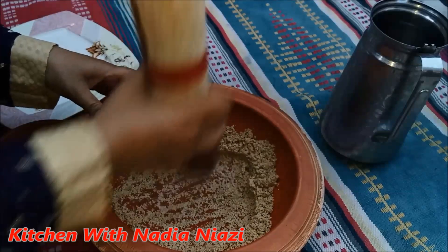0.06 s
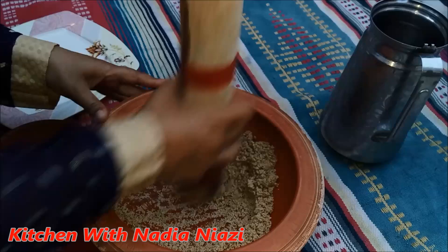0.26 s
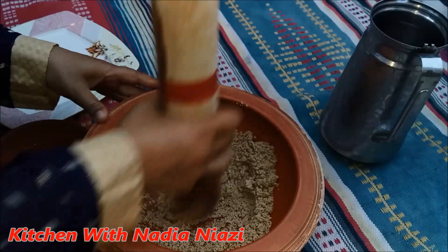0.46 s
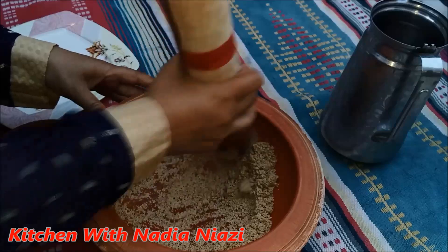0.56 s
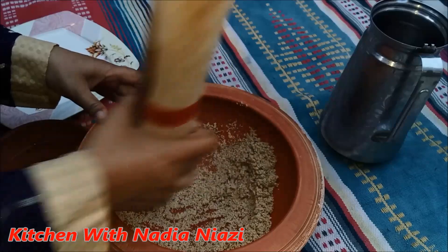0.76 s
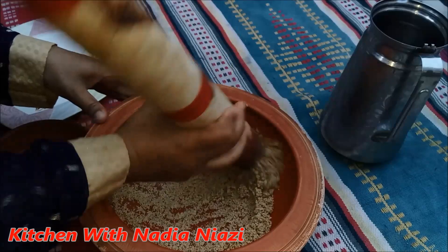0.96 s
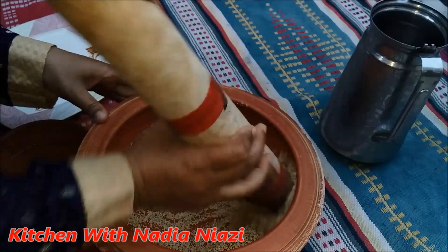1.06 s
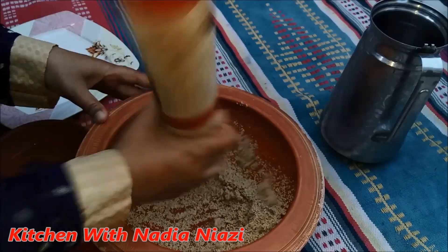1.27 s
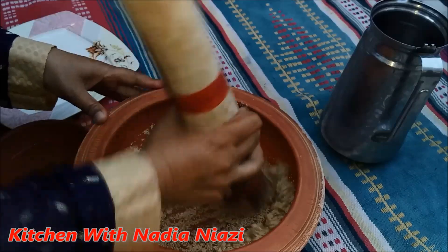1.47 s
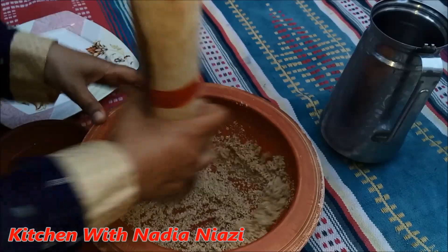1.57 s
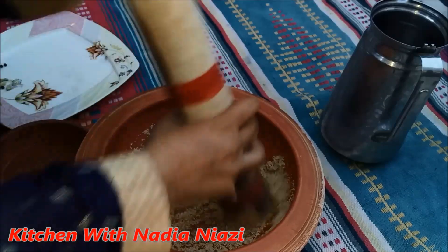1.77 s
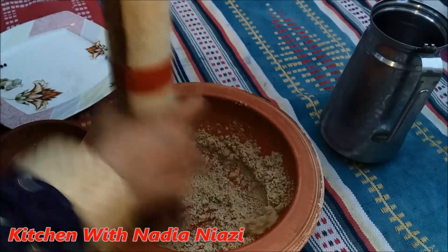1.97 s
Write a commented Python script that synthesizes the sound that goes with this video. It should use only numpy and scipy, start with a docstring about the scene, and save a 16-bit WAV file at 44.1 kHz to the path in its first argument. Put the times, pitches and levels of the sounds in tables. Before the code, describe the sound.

Seeds ground in a clay bowl after two ringing knocks of a wooden pestle.

```python
"""A wooden pestle knocks twice on a clay bowl, drops into crushed seeds and grinds them in rasping strokes.
The free bowl rings clearly; under the pressed pestle there is only a dull drone. Seeds crunch and snap,
powder slides and sprays, and wood on bare clay scrapes and briefly sings.
One microphone close to the bowl, in a small quiet room with a low hum."""
import sys
import numpy as np
from scipy import signal
from scipy.fft import rfft, irfft
from scipy.io import wavfile
from scipy.ndimage import uniform_filter1d

SR = 44100
rng = np.random.default_rng(int(sys.argv[2]) if len(sys.argv) > 2 else 0)


def wrap_up_sound(samples):
    """Save the sound to the file named by the first command line argument, as 16-bit audio."""
    columns = np.atleast_2d(samples).T
    # keep every value between -1 and 1, then stretch to whole-number steps
    tamed = np.clip(columns, -1, 1)
    steps = np.round(tamed * 32767).astype(np.int16)
    wavfile.write(sys.argv[1], SR, steps)


N = 88200


def undb(db):
    """Decibels to gain."""
    return 10 ** (np.asarray(db) / 20)


def unit(x):
    """Scale to rms 1."""
    return x / np.sqrt(np.mean(x ** 2))


def colour(x, points):
    """Filter by a spectrum of (Hz, dB) points; rms 1."""
    hz, db = np.array(points).T
    f = np.maximum(np.arange(N // 2 + 1) * SR / N, 1)
    gain = undb(np.interp(np.log(f), np.log(hz), db))
    return unit(irfft(rfft(x) * gain, N))


def resonate(x, modes):
    """Pass through parallel resonances of (Hz, width in Hz, dB); rms 1."""
    f = np.maximum(np.arange(N // 2 + 1) * SR / N, 1)
    response = sum(undb(db) / (1 + 1j * (f * f - hz * hz) / (f * width)) for hz, width, db in modes)
    return unit(irfft(rfft(x) * response, N))


def noise(points):
    """Steady noise with a spectrum of (Hz, dB) points; rms 1."""
    return colour(rng.standard_normal(N), points)


def grains(per_s=9000, spread_db=2):
    """Dense tiny fractures of uneven size."""
    clicks = (rng.random(N) < per_s / SR) * rng.choice([-1, 1], N)
    return clicks * undb(spread_db * rng.standard_normal(N))


def walk(per_s):
    """Smooth random wander; rms 1."""
    step = int(SR / per_s)
    return unit(uniform_filter1d(np.repeat(rng.standard_normal(N // step + 1), step), step)[:N])


def burst(age, fall_s):
    """Sudden start, exponential fall."""
    return (age >= 0) * np.exp(-np.maximum(age, 0) / fall_s)


def swells(t, rows):
    """Bell-shaped swells from rows of (peak time in s, half length in s, dB)."""
    return sum(undb(db) * np.exp(-((t - at) / half) ** 2 / 2) for at, half, db in rows)


def room_tone():
    """The quiet room behind the bowl: a noise floor, a low hum and two slightly wavering tones."""
    # Noise floor. Each row: frequency in Hz, relative level in dB.
    floor_spectrum = [(20, -39.5), (38, -37), (60, 0.5), (95, -1), (140, -3.5), (205, -5), (280, -8),
                      (450, -13), (720, -9.5), (1100, -13), (1800, -23), (3000, -29), (6000, -40.5),
                      (7500, -34), (10000, -43.5), (16000, -47.5)]
    # Hum. Each row: frequency in Hz, width in Hz, relative level in dB.
    hum_bands = [(90.6, 23, -5), (130.8, 24, -1.5), (242, 13, -6.5)]
    # Low tones. Each row: frequency in Hz, level in dB.
    tones = [(127, -53.5), (202.5, -49)]
    hum = resonate(noise([(30, -18), (80, -0.5), (250, 0), (3000, -33.5)]), hum_bands)
    out = undb(-46.5) * noise(floor_spectrum) + undb(-52.5) * hum
    for hz, db in tones:
        level = undb(db + 1.5 * walk(per_s=8.25))
        drifting_hz = hz + 1.38 * walk(per_s=5.75)
        out += level * np.sin(2 * np.pi * np.cumsum(drifting_hz) / SR)
    return out


def room_reverb(x, t, t60_s=0.19, wet_db=-15.5):
    """Nearby walls add a short diffuse tail, well below the direct sound at the microphone."""
    tail = rng.standard_normal(N) * burst(t - 0.005, t60_s / np.log(1000))
    return x + undb(wet_db) * signal.fftconvolve(x, tail / np.sqrt(np.sum(tail ** 2)))[:N]


def bowl_echo(x, t, lag_s=0.000796, swing=0.22, echo_db=-10.5):
    """A very short echo off the bowl's wall, shifting as the pestle moves, colours the grinding."""
    lag = lag_s * (1 + swing * np.tanh(walk(per_s=9)))
    return x + undb(echo_db) * np.interp(t - lag, t, x)


def sympathetic_ring(seeds):
    """Breaking seeds keep the clay faintly ringing after each stroke."""
    # Bowl overtones. Each row: frequency in Hz, width in Hz, relative level in dB.
    overtones = [(807, 5.7, 6.5), (1815, 7, 4.5), (3096, 6.5, 5)]
    return undb(-60.5) * resonate(seeds, overtones)


def powder_spray(t):
    """Fine dry powder hisses as it sprays aside."""
    # Sprays. Each row: peak time in seconds, half length in seconds, level in dB.
    sprays = [(0.145, 0.045, -64), (0.916, 0.025, -53.5), (0.979, 0.0098, -42.5), (1.898, .025, -48)]
    # Their hiss. Each row: frequency in Hz, relative level in dB.
    hiss_spectrum = [(3000, -29), (8000, 4), (12000, 5), (16000, -1.5)]
    return colour(grains(), hiss_spectrum) * swells(t, sprays)


def seed_cracks(t, fall_s=0.0022):
    """Lone seeds snap, each with a bright click."""
    # Cracks. Each row: start in seconds, level in dB.
    cracks = [(.278, -31), (.543, -59), (0.914, -37.5), (.938, -41), (0.988, -33.5), (1.679, -48)]
    snap = noise([(500, -7.5), (4000, -6), (10000, 1), (16000, -12.5)])
    return snap * sum(undb(db) * burst(t - at, fall_s) for at, db in cracks)


def rubbing(t, sing_hz=1680, waver_hz=15.3, roughness=0.35):
    """Where wood meets bare clay it scrapes hollowly, and stick-slip makes one wall mode sing."""
    # Singing and scraping. Each row: peak time in seconds, half length in seconds, level in dB.
    sings = [(0.71, 0.021, -44), (0.976, 0.042, -54), (1.243, 0.014, -38), (1.307, 0.018, -44),
             (1.462, 0.0055, -37.5), (1.609, 0.0056, -43), (1.71, 0.074, -52)]
    scrapes = [(1.235, 0.009, -44.5), (1.336, 0.036, -45.5), (1.612, 0.027, -37), (1.975, 0.06, -39.5)]
    # Hollow tone of the scrape. Each row: frequency in Hz, relative level in dB.
    scrape_spectrum = [(200, -9), (850, -25), (1020, 1.5), (1200, 3.5), (1450, -11.5), (1700, 0.5),
                       (2200, -23), (6000, -32), (16000, -53)]
    phase = 2 * np.pi * np.cumsum(sing_hz + waver_hz * walk(per_s=90)) / SR
    sing = unit(np.sin(phase) * (1 + roughness * walk(per_s=240)))
    scrape = colour(grains(), scrape_spectrum)
    return sing * swells(t, sings) + scrape * swells(t, scrapes)


def grinding(t, flicker_db=0.7):
    """Strokes swell and fade over a dull drone: powder rasps, seeds crunch, the bowl bumps on cloth."""
    # Strokes. Each row: peak time, rise and fall in seconds, then rasp, crunch, drone and bump in dB.
    strokes = [(0.1206, .0007, 0.00198, -65.5, -45, -38.5, -38.5),
               (.15, 0.035, 0.101, -68, -60, -61, -46.5), (0.275, 0.0041, 0.017, -39.5, -38, -34, -29),
               (.315, 0.041, 0.026, -60, -55, -40, -36), (.44, 0.056, 0.043, -61.5, -54.5, -62.5, -58),
               (.635, .01, 0.027, -60, -66, -39.5, -48), (0.691, 0.029, 0.034, -45, -45, -39, -43.5),
               (.885, .03, 0.06, -53, -55.5, -58.5, -62), (0.984, 0.025, 0.011, -44, -45.5, -41, -65),
               (1.062, 0.012, 0.017, -52.5, -57, -71.5, -47.5),
               (1.104, 0.015, 0.0081, -41, -42.5, -53, -72), (1.195, 0.016, 0.013, -42, -65.5, -45.5, -74),
               (1.238, 0.025, 0.013, -38.5, -39.5, -45.5, -66.5),
               (1.336, 0.036, 0.05, -48, -46.5, -45.5, -84), (1.469, 0.031, 0.035, -40.5, -44.5, -42, -55),
               (1.516, 0.027, 0.012, -46.5, -43.5, -48, -43), (1.611, 0.035, 0.04, -45, -43, -43, -52),
               (1.797, 0.049, 0.071, -39.5, -42.5, -43, -54.5),
               (1.898, 0.022, 0.03, -43.5, -43.5, -40, -59), (1.975, 0.11, 0.09, -57.5, -41.5, -42.5, -40)]
    # Sliding powder and breaking seeds. Each row: frequency in Hz, relative level in dB.
    rasp_spectrum = [(300, -27), (2000, -30), (3800, -8.5), (5200, 3.5), (9000, -0.5), (10500, -6),
                     (13000, -14), (16000, -11)]
    crunch_spectrum = [(100, -33), (500, 3), (1100, 2), (1700, 2), (2700, -1), (4000, -3), (7000, -19),
                       (16000, -22)]
    # Dull drone under the pressed pestle: a low table or room resonance plus the bowl's damped modes.
    # Each row: frequency in Hz, width in Hz, relative level in dB.
    drone_modes = [(202.2, 5.1, 6), (251, 11, 1), (313.5, 39, -2.5), (681, 46, 5.5), (810.7, 6.1, 3.5),
                   (1643, 67, -3.5)]
    rasp = colour(grains(), rasp_spectrum)
    crunch = colour(grains(), crunch_spectrum)
    friction = colour(grains(), [(40, -22), (110, 3), (1800, 6), (4000, -48), (16000, -34)])
    drone = resonate(friction, drone_modes)
    rumble = noise([(30, -28), (80, -7), (150, -9), (600, -1.5), (4000, -59.5)])
    bump = resonate(rumble, [(93.2, 15, 0)])
    layers = np.array([rasp, crunch, drone, bump])
    power = np.zeros_like(layers)
    for at, rise, fall, *levels_db in strokes:
        from_peak = np.where(t < at, ((t - at) / rise) ** 2, np.abs((t - at) / fall) ** 0.95)
        push = np.exp(-from_peak / 2)
        power += (undb(levels_db)[:, None] * push) ** 2
    grit = undb(flicker_db * walk(per_s=130))
    return np.sum(layers * np.sqrt(power), axis=0) * grit


def pestle_blows(t, shove_s=0.00035):
    """The brief shove of contact, the dull thud of wood, and the tick of a seed caught beneath it."""
    # Hard blows. Each row: start in seconds, thud level in dB, tick level in dB.
    blows = [(0.2221, -20, -55), (0.6166, -24.5, -31)]
    # Dead modes of pestle and bowl base. Each row: frequency in Hz, relative level in dB, T60 in seconds.
    wood_modes = [(179.5, -11.5, 0.15), (301.7, -5, 0.091), (439, -8, 0.058), (573, -0.5, 0.049),
                  (725, 6.5, .05), (910, -31.5, 0.045), (1214, -7.5, 0.056), (2263, -7, 0.023)]
    # Wood thud and seed tick. Each row: frequency in Hz, relative level in dB.
    thud_spectrum = [(60, -44.5), (150, -0.5), (300, -6), (480, -4), (700, 6.5), (900, -3), (1250, -6),
                     (1500, -12), (2000, -22), (5000, -45), (16000, -57.5)]
    tick_spectrum = [(300, 6.5), (2600, -6), (5000, 2.5), (9000, 0.5), (16000, -9.5)]
    out = np.zeros(N)
    for at, thud_db, tick_db in blows:
        age = np.maximum(t - at, 0)
        onset = 1 - np.exp(-(age / 0.0013) ** 2)
        contact = (t - at) / shove_s - 1
        shove = -undb(5.5) * contact * np.exp(-contact ** 2 / 2)  # soft contact through the seed layer
        wood = sum((-1) ** k * undb(db) * burst(age, t60 / np.log(1000)) * np.sin(2 * np.pi * hz * age)
                   for k, (hz, db, t60) in enumerate(wood_modes))
        hit_and_tail = undb(3) * burst(age, fall_s=0.0065) + undb(-10.5) * burst(age, fall_s=0.059)
        thud = noise(thud_spectrum) * hit_and_tail
        out += undb(thud_db) * (shove + onset * (wood + thud))
        out += undb(tick_db) * noise(tick_spectrum) * burst(t - at, fall_s=0.0024)
    return out


def bowl_ring(t, contact_curve=4.5, upper_damping_share=0.93):
    """Each knock rings the bowl; the main tone stays level briefly, as if held by a limiter, then fades."""
    # Knocks and light touches. Each row: start in seconds, ring level and upper-mode offset in dB,
    # attack, hold and contact in seconds, pestle damping in dB (a negative value lifts the ring).
    knocks = [(.2222, -4.5, 0, 0.0027, 0.023, 0.037, -3), (.6172, -8.3, 0, .0022, .0, .059, 22),
              (0.67, -28, -4.5, 0.0046, 0.048, 0.069, 0), (.912, -30, 13.5, 0.037, 0.029, 0.06, 25),
              (.98, -38, -3, 0.012, 0.023, 0.077, 3.5), (1.25, -41.5, -12, 0.024, 0.055, 0.074, 1.5),
              (1.436, -40.5, -6, 0.022, 0.036, 0.048, 2.5), (1.94, -36.5, -21, 0.018, 0.026, .05, 2)]
    # The free bowl. Each row: frequency in Hz, relative level in dB, T60 in seconds.
    bowl_modes = [(814.1, 0.5, 0.48), (1819.4, -12, 0.33), (677, -14.5, 0.18), (3141, -41.5, 0.3),
                  (3566, -40, .12), (3763, -41.5, 0.089), (4630, -47.5, .2), (6300, -51.5, 0.072)]
    out = np.zeros(N)
    for at, ring_db, upper_db, attack, hold, contact, damp_db in knocks:
        age = np.maximum(t - at, 0)
        touch = np.clip(age / contact, 0, 1)
        onset = np.sin(np.pi / 2 * np.minimum(age / attack, 1)) ** 2
        for k, (hz, db, t60) in enumerate(bowl_modes):
            if k == 0:  # the main mode feels the contact late, the others at once
                fall_db = -60 * np.maximum(age - hold, 0) / t60 - damp_db * touch ** contact_curve
            else:
                fall_db = upper_db - 60 * age / t60 - upper_damping_share * damp_db * touch
            out += undb(ring_db + db + fall_db) * onset * np.sin(2 * np.pi * hz * age)
    return out


def scene():
    """Knocks and grinding close to the microphone, over the room tone; mono."""
    t = np.arange(N) / SR
    seeds = bowl_echo(grinding(t) + powder_spray(t), t)
    work = pestle_blows(t) + seeds + sympathetic_ring(seeds) + rubbing(t) + seed_cracks(t)
    return (bowl_ring(t) + room_reverb(work, t) + room_tone())[None]


def record(dry):
    """A steep low-pass cuts the treble above 15.7 kHz."""
    return signal.sosfilt(signal.ellip(10, 0.2, 70, 15700, fs=SR, output="sos"), dry)


dry = scene()
out = record(dry)
wrap_up_sound(out)
```